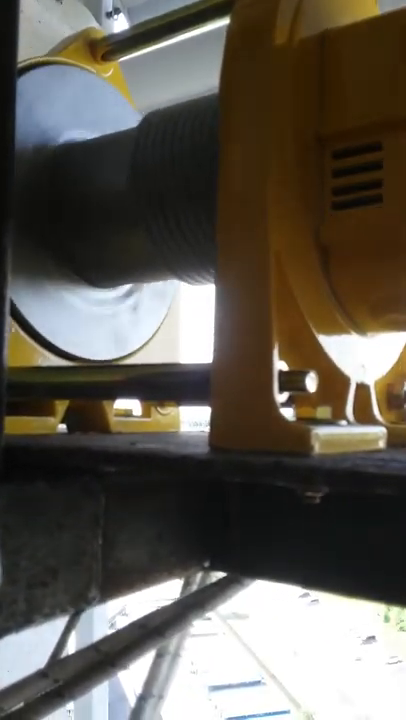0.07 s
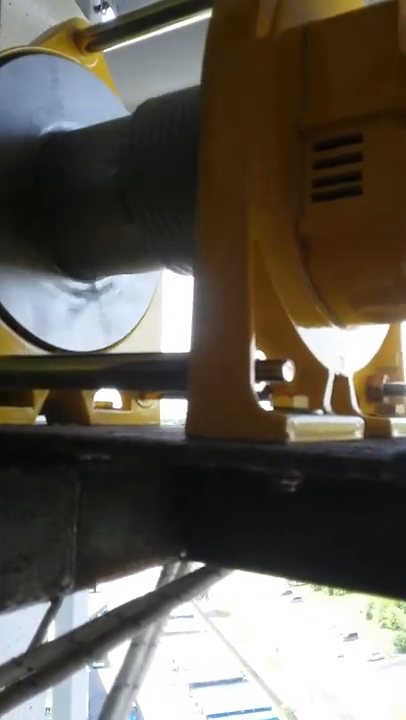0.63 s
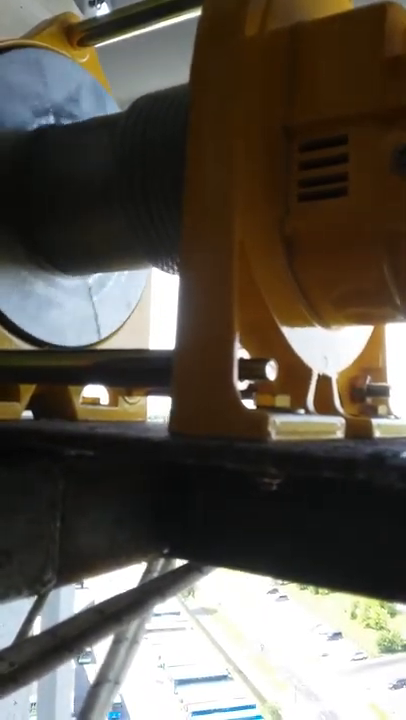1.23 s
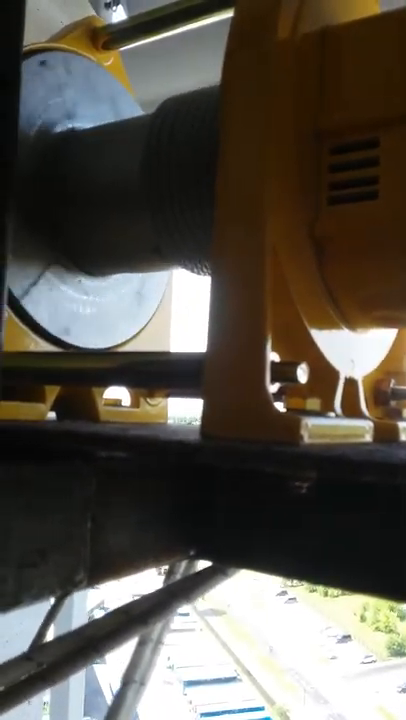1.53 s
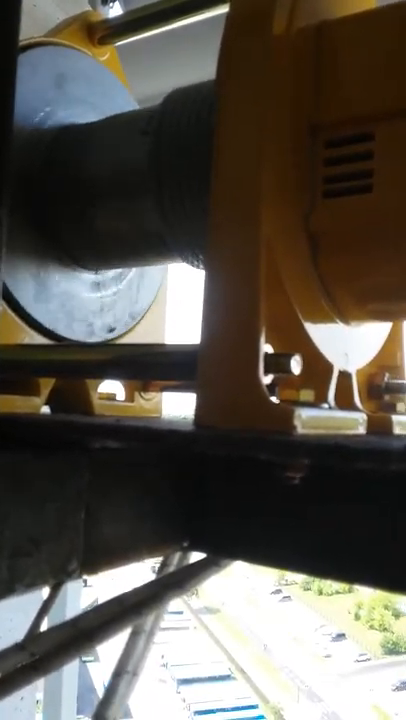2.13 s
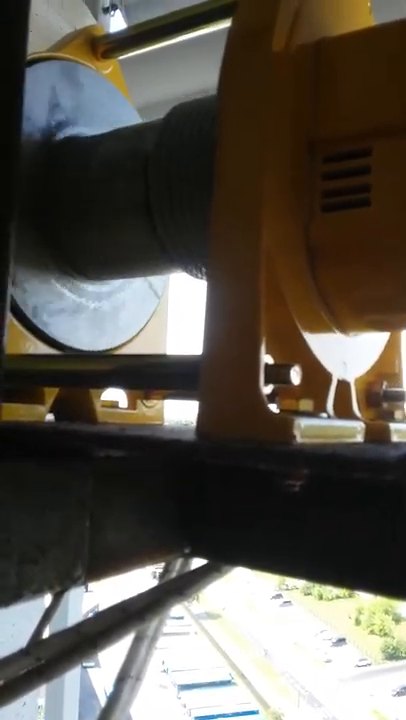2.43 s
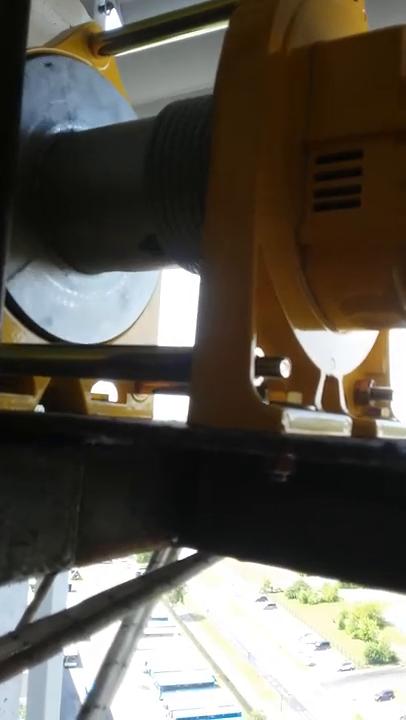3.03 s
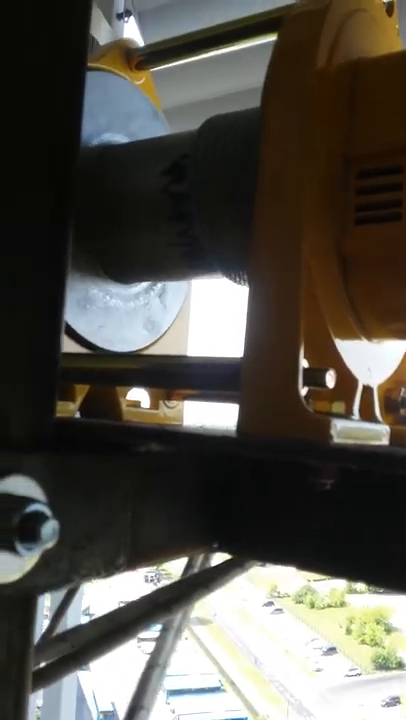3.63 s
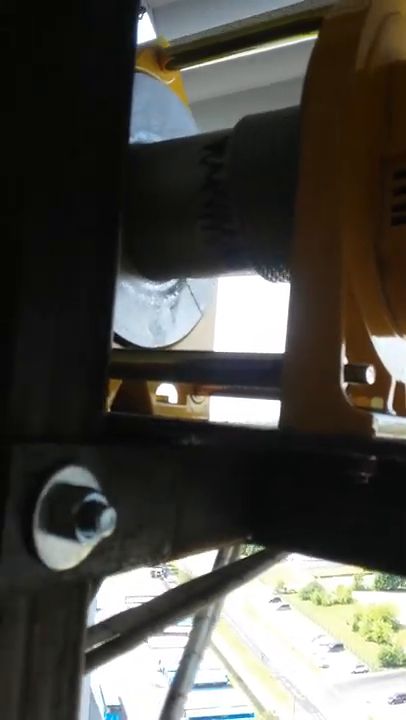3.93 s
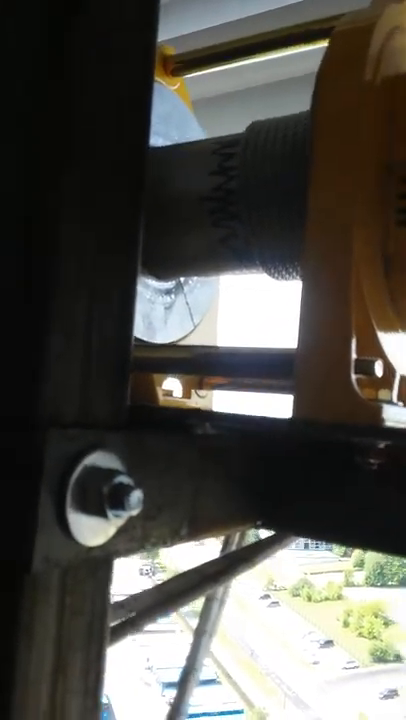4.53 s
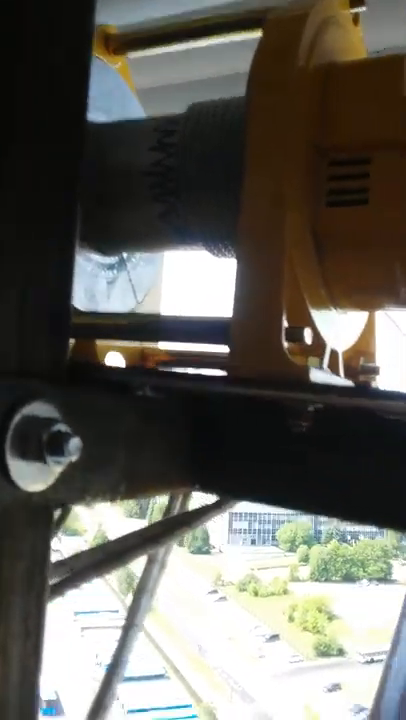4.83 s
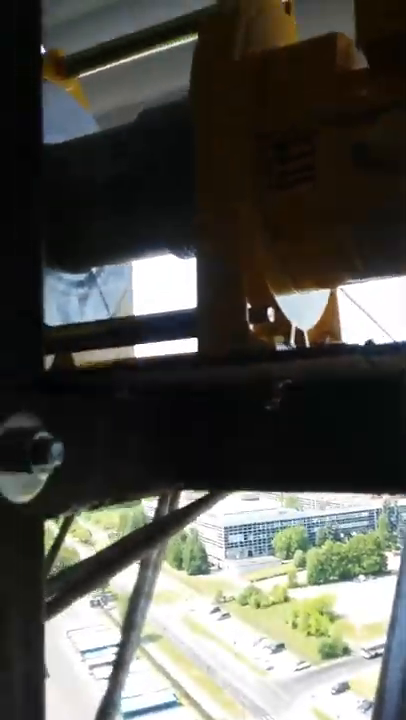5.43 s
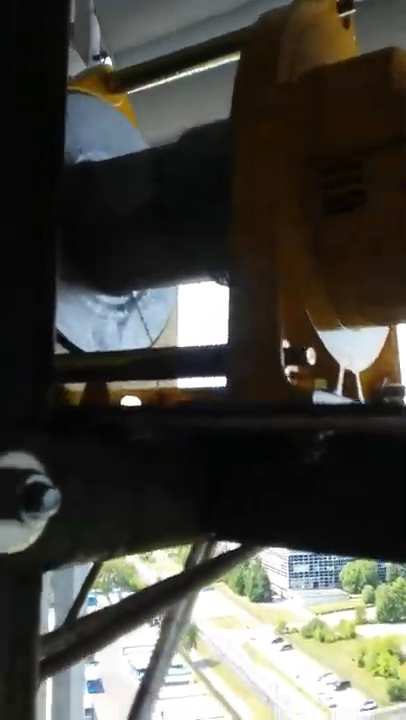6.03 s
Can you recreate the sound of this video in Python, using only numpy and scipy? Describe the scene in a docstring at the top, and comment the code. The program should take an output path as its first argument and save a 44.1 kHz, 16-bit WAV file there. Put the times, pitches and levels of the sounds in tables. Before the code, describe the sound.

An electric rope hoist runs loudly at full speed, close by on an outdoor steel frame: gears rattle the housing, the motor whines, and the fan rushes with a high hiss. At 0.7 seconds the power cuts and the pitch drops steeply. A soft puff of wind bumps the microphone at 1.2 seconds, and a dull clank follows at 1.4. At 1.7 a short burst of power sends the whine up, then it falls again. The hoist coasts with a sinking whistle, slowing gear knocks and the thin ring of rubbing steel, fading and dulling until it stops around 4.6 seconds. Small metallic ticks come at 4.8 and 5.1, with a fainter one between, followed by a light scratchy rustle. A distant town's low wash and faint machine hum lie underneath. At 6.2 seconds the motor suddenly restarts with knocks and a harsh rasp.

```python
"""An electric rope hoist on a high steel frame runs at full speed above a distant town: gear teeth
rattle the housing, the rotor (the motor's spinning part) whines and the fan rushes. At 0.7 s the power
goes off and a brake slows it; a soft gust passes. After one short burst of power at 1.7 s it coasts
to rest, its whistle falling and a rubbing steel part ringing. Around 5 s come two small ticks, with
a fainter one between them, and a light rustle. At 6.2 s the motor kicks in again with a rasp."""
import sys
import numpy as np
from scipy import signal
from scipy.fft import rfft, irfft
from scipy.io import wavfile
from scipy.ndimage import uniform_filter1d

SR = 44100
rng = np.random.default_rng(int(sys.argv[2]) if len(sys.argv) > 2 else 0)


def transcribe(u):
    """Save the signal u as a 16-bit wav file named by the first command-line argument.

    u: samples, shape (n,) or (channels, n), limited to [-1, 1]; the rate is SR.
    q: integer samples, one column per channel.
    """
    v = np.clip(np.atleast_2d(u).T, -1, 1)
    q = np.round(v * 32767).astype(np.int16)
    wavfile.write(sys.argv[1], SR, q)


N = 276948
TIME = np.arange(N) / SR
FULL_HZ, RELEASE_HZ = 220, 77.2  # rotor turns a second: at full speed, and where the brake lets go
WHEEL_RATIO = .4425  # turns of the slower gear wheel for each rotor turn
TEETH, TOP_HZ = 16, 15650  # teeth on the rotor's small gear; upper edge of the treble

# rotor speed during each of the three spells of power: t/s, speed/Hz
RUN = [(0, 231), (.26, 216.3), (.42, 222), (.55, 214.6), (.689, 203)]
BURST = [(1.69, 55), (1.72, 108), (1.75, 128), (1.79, 146), (1.844, 154)]
RESTART = [(6.189, 63), (6.235, 76), (6.28, 82)]
# how strongly the gear housing gives off each pitch: f/Hz, level/dB
GEAR_COLOUR = [(60, -32), (140, -15.5), (220, -10.5), (300, -8), (430, -2), (620, -4), (900, 1),
               (1300, -2.5), (1800, -1), (2230, -1.5), (2450, -11), (3500, -9.5), (5300, -25.5),
               (7500, -49.5)]


def rotor(drive_db=1.5, braking_db=-7, build_s=.097, brake_rise_s=.064):
    """Speed and torque (twisting force): the motor pulls hardest when slow, and runs down when off."""
    hz, torque = np.zeros(N), np.zeros(N)
    for spell in (RUN, BURST, RESTART):
        (on, _), (off, last_hz) = spell[0], spell[-1]
        speed = np.where(TIME < off, curve(spell), run_down(last_hz, TIME - off))
        slip = np.maximum(1 - speed / FULL_HZ, 0)
        driving = undb(drive_db) * slip ** 1.75 * np.clip((TIME - on) / build_s, 0, 1) ** 1.3
        braking = undb(braking_db) * brake_grip(speed) ** 1.1
        cut = np.clip((TIME - off) / brake_rise_s, 0, 1)
        hz = np.where(TIME < on, hz, speed)
        torque = np.where(TIME < on, torque, (1 - cut) * driving + cut * braking)
    return hz, torque


def run_down(hz, age, friction_hz_per_s=26.2, drag_per_s=.126, brake_hz_per_s=666, step_s=.001):
    """Speed after the power is cut: a steep fall under the brake, then a long coast to rest."""
    speeds = [hz]
    while speeds[-1] > 0:
        now = speeds[-1]
        slowing = friction_hz_per_s + drag_per_s * now + brake_hz_per_s * brake_grip(now) ** .562
        speeds.append(max(now - step_s * slowing, 0))
    return np.interp(age, step_s * np.arange(len(speeds)), speeds)


def brake_grip(hz):
    """How hard the brake holds: 1 at full speed, 0 once it has let go."""
    return np.maximum(hz - RELEASE_HZ, 0) / (FULL_HZ - RELEASE_HZ)


def gears(turns, slap=1.24, slap_turns=.029, throb=.16, grind=.91):
    """Teeth strike unevenly, harder once per turn of the slower wheel, and make the housing ring."""
    # ringing notes of the housing and frame: f/Hz, width/Hz, level/dB over GEAR_COLOUR
    housing = [(200, 23, 6.5), (343, 29, 4.5), (421, 27, -3.5), (545, 11, 4), (805, 26, 0.5),
               (962.6, 5.5, 6.5), (1084, 16, 5.5), (1280, 39, -13), (1510, 15, 3.5), (1606, 2.2, 9),
               (1710, 19, 5.5), (1753, 5.7, 12.5), (1950, 20, 0), (1925, 55, 3.5), (2136, 27, 7.5),
               (2248, 2.8, 10), (2656, 85, 7), (4350, 56, 6)]
    contacts = each_turn(2 * TEETH * turns)  # each tooth touches on both sides
    strikes = unit(contacts * noise() * scatter(3.5))
    strikes /= np.sqrt(uniform_filter1d(strikes ** 2, SR // 8) + 1e-3)  # equal power at every speed
    wheel = 1 + slap * np.exp(-(WHEEL_RATIO * turns % 1) / slap_turns)
    wheel += throb * np.cos(2 * np.pi * 3 * WHEEL_RATIO * turns)
    force = (unit(strikes * wheel) + grind * noise()) * undb(-.18 * wander(33))
    return ring(force, colour(GEAR_COLOUR) * np.sqrt(1 + resonances(housing)))


def knocks(hz, turns, rattle_gain, ring_hz=1860, decay_s=.00082, grit_db=-8):
    """Slack in the gears closes with a dull clank: once a wheel turn off the brake, a few times hard."""
    # single hard knocks: t/s, level/dB
    hard_knocks = [(1.362, -8.5), (1.695, -17.5), (6.192, -11), (6.213, -12)]
    # tone of the grit in each clank: f/Hz, level/dB
    grit_colour = [(600, -16), (1500, 20), (2200, -17), (3500, -18)]
    grit = undb(grit_db) * ring(noise(), colour(grit_colour))
    looseness = np.maximum(1 - brake_grip(hz), 0)  # the knocks fade out towards full speed
    hits = each_turn(WHEEL_RATIO * turns) * rattle_gain * looseness * undb(.5) * scatter(1.5)
    for s, db in hard_knocks:
        hits[round(s * SR)] += undb(db)
    age, size = (part[:SR // 50] for part in blow(0, 0, decay_s))
    clank = signal.fftconvolve(hits, size * np.sin(2 * np.pi * ring_hz * age))[:N]
    crunch = grit * signal.fftconvolve(hits, size)[:N]
    return filtered(clank + crunch, "lowpass", 4000, order=4)


def soften(rattle, hz, soft_speed_hz=15, dull_db=7.5):
    """Slow teeth roll onto each other, so the rattle turns dull just before the rotor stops."""
    hard = 1 - np.exp(-(hz / soft_speed_hz) ** 2)
    dull = filtered(rattle, "lowpass", 1860, order=2)
    return hard * rattle + (1 - hard) * undb(dull_db) * dull


def jolt(db=-18, rise_s=.0054, decay_s=.21):
    """The sudden twist of the last start sets the housing ringing with a harsh rasp."""
    # notes shaken by the jolt: f/Hz, width/Hz, level/dB
    modes = [(2130, 110, 2), (3550, 750, -18), (5100, 320, -16)]
    age = np.maximum(TIME - RESTART[0][0], 0)
    outline = colour([(800, -25), (2000, -2.5), (5400, .5), (7000, -9)])
    rasp = ring(noise(), np.sqrt(resonances(modes)) * outline)
    return undb(db) * (1 - np.exp(-age / rise_s)) * np.exp(-age / decay_s) * rasp


def gear_whine(hz, turns, torque):
    """The small gear sings at the rate its teeth meet, while it drives or brakes the rope drum."""
    # tones of the loaded gear: multiple of the tooth rate, level/dB
    overtones = [(1, -1.5), (2, -29.5), (3, -29)]
    song = sum(undb(db) * tone(turns, TEETH * round(k), rough=.8, flutter_hz=120) for k, db in overtones)
    housing_gain = undb(np.interp(TEETH * hz, *np.transpose(GEAR_COLOUR)))
    return torque * housing_gain * filtered(song, "lowpass", 4000, order=8)


def whistle(hz, turns, boost_db=1.6, onset_speeds_hz=(24, 52)):
    """High rotor tones follow the speed, and swell at pitches where the frame rings easily."""
    # tones of the rotor: multiple of its speed, level/dB
    overtones = [(48, -40.5), (96, -47.5), (144, -49.5)]
    # how well the frame gives off each pitch: f/Hz, level/dB
    radiation = [(1200, -16), (2400, -5), (3100, -2), (3700, 2), (4400, -3.5), (5400, -2.5), (6200, -9),
                 (7400, -12), (9200, -12), (10000, -8.5), (10700, -5), (11500, -28)]
    song = 0
    for k, db in overtones:
        pitch = k * hz
        frame_gain = (pitch < TOP_HZ) * undb(np.interp(pitch, *np.transpose(radiation)))
        song += undb(db) * frame_gain * tone(turns, k, rough=1.1, flutter_hz=90)
    turning = np.interp(hz, onset_speeds_hz, (0, 1))
    return undb(boost_db) * plates(song * turning, decay_s=.01, share=.2)


def fan(hz, turns, air_db=-24, boom_db=-44.5, boom_hz=205.5, boom_width_hz=29):
    """Rushing air, blade tones and the boom of the shaken frame all grow with speed."""
    # tones of the off-balance rotor and the blades: multiple of rotor speed, level/dB
    fan_tones = [(1, -30), (2, -31.5), (10, -21), (49, -52)]
    # tone of the rushing air: f/Hz, level/dB
    air_colour = [(120, -47), (200, -2), (300, -1), (430, -13), (800, 8.5), (2000, 2), (4200, -19),
                  (8000, -30)]
    tones = sum(undb(db) * tone(turns, round(k), rough=.53, flutter_hz=12 + 3 * round(k))
                for k, db in fan_tones)
    tones = filtered(tones, "highpass", 190, order=6)  # deep tones pass poorly into the air
    air = undb(air_db) * ring(noise(), colour(air_colour))
    boom = undb(boom_db) * ring(noise(), resonances([(boom_hz, boom_width_hz, boom_db)]))
    speed = hz / FULL_HZ
    return tones * speed ** 2.1 + air * speed ** 1.3 + boom * speed


def rubbing(hz, turns, throb=.19, patchy_db=2.2):
    """Rubbing steel catches once a turn, grips in patches and rings in a cluster of close notes."""
    # ringing notes of the rubbed steel: f/Hz, width/Hz, level/dB
    modes = [(2710, 21, -3), (3040, 57, -4.5), (3110, 13, 2), (3123, 15, 2), (3175, 17, 5.5),
             (3317, 25, -2.5), (5260, 71, -31.5)]
    catch = (1 + throb * np.cos(2 * np.pi * turns)) * undb(patchy_db * wander(9))
    outline = colour([(1500, 6), (2700, -15), (5400, 2), (7000, -37)])
    ringing = ring(noise() * catch, np.sqrt(resonances(modes)) * outline)
    return loudness(hz, top_db=-32, knee_hz=23.3, steepness=2.43) * ringing


def hiss(hz, fade_speed_hz=28, flare=.18, flare_s=.04):
    """A grainy high hiss that flares briefly as the power is cut and dies away at low speed."""
    # tone of the hiss: f/Hz, level/dB
    hiss_colour = [(3000, -18), (5200, 6.5), (6400, 1), (7500, -3), (9300, 3.5), (10700, -5), (12500, -10),
                   (15500, -52)]
    treble_fade = 1 - np.exp(-(hz / fade_speed_hz) ** 4)
    cuts = sum(swell(spell[-1][0], flare_s) for spell in (RUN, BURST))
    gain = loudness(hz, top_db=-32, knee_hz=161, steepness=1.34) * treble_fade * (1 + flare * cuts)
    grains = noise() * undb(1.5 * wander(320) - .5 * wander(35))
    return gain * plates(ring(grains, colour(hiss_colour)), decay_s=.015, share=.1)


def plates(x, decay_s, share):
    """Large steel plates ring on briefly, with countless close notes."""
    age = TIME[:SR // 5]
    tail = rng.standard_normal(len(age)) * np.exp(-age / decay_s)
    ringing = signal.fftconvolve(x, tail)[:N] / np.sqrt(np.sum(tail ** 2))
    return np.sqrt(1 - share) * x + np.sqrt(share) * ringing


def ticks(thud_pitch_ratio=.43, thud_db=-7):
    """Each tick is a sharp crack, a very short ring and a lower thud in the metal behind it."""
    # small ticks: t/s, level/dB, f/Hz, decay/s, crack/dB relative to the ring
    events = [(4.7917, -19, 3030, 0.0006, -47), (4.948, -43, 3600, 0.00046, -19),
              (5.133, -27, 2990, 0.00091, -5.5)]
    crack = ring(noise(), colour([(2000, 1), (4500, 8), (6000, -15), (7400, 8), (9500, -13), (15000, -1)]))
    out = np.zeros(N)
    for s, db, hz, decay_s, crack_db in events:
        age, size = blow(s, db, decay_s)
        angle = 2 * np.pi * hz * age
        thud = undb(thud_db) * np.sin(thud_pitch_ratio * angle)
        out += size * (np.sin(angle) + thud + undb(crack_db) * crack)
    return out


def rustle(grain_db=3):
    """A hand shifts its grip with a faint, scratchy rustle."""
    # movements of the hand: t/s, level/dB, width/s
    moves = [(5.135, -47, .012), (5.267, -59, 0.23)]
    # tone of the rustle: f/Hz, level/dB
    rustle_colour = [(1000, -8), (2900, 10), (4600, 6), (6000, -22), (7400, -7), (9000, -22), (15000, -18)]
    size = sum(undb(db) * swell(s, width_s) for s, db, width_s in moves)
    return size * ring(noise() * undb(grain_db * wander(120)), colour(rustle_colour))


def hum():
    """Faraway machines hold a few faint, wavering tones."""
    # tones of the machines: f/Hz, level/dB
    notes = [(94, -54), (167, -54.5), (188, -64), (248, -54.5), (382, -54.5), (587, -50.5), (974, -56)]
    return sum(undb(db) * tone(TIME, hz, rough=.95, flutter_hz=5.5) for hz, db in notes)


def town(db=-39.37, waver_db=.6):
    """The town far below blends into a low, gently wavering wash of noise."""
    # tone of the town: f/Hz, level/dB
    town_colour = [(25, -37), (40, -36), (58, -1), (85, -5), (180, -2.5), (280, -5), (380, -6), (600, -7.5),
                   (1100, -9.5), (2000, -17), (3200, -25.5), (4700, -38.5), (6400, -61.5), (15000, -51)]
    return ring(noise(), colour(town_colour)) * undb(db + waver_db * wander(15))


def gust(at_s=1.212, db=-30, width_s=.02):
    """One soft puff of wind bumps the microphone."""
    rumble = ring(noise(), colour([(40, -22), (95, 3), (140, 0), (260, -11), (1000, -61)]))
    return undb(db) * swell(at_s, width_s) * rumble


def undb(db):
    """Turn decibels into a gain to multiply by."""
    return 10 ** (np.asarray(db) / 20)


def curve(rows):
    """Join (time, value) points with straight lines."""
    return np.interp(TIME, *np.transpose(rows))


def unit(x):
    """Scale a signal to an average size (rms) of 1."""
    return x / np.sqrt(np.mean(x ** 2))


def noise():
    """White noise: all pitches equally strong."""
    return rng.standard_normal(N)


def scatter(db):
    """Random gains, spread by about db decibels."""
    return undb(db * np.clip(noise(), -2, 2))


def wander(rate_hz):
    """A smooth random drift of size 1 that changes about rate_hz times a second."""
    return unit(irfft(rfft(noise()) * np.exp(-(np.fft.rfftfreq(N, 1 / SR) / rate_hz) ** 2), N))


def each_turn(turns):
    """One pulse whenever the count passes a whole number."""
    return np.diff(np.floor(turns), prepend=0) > 0


def colour(points):
    """Gain at every frequency, from an outline of points: f/Hz, level/dB."""
    hz, db = np.transpose(points)
    return undb(np.interp(np.log(np.fft.rfftfreq(N, 1 / SR) + 1), np.log(hz), db))


def resonances(modes):
    """Power at every frequency, with one peak for each ringing note (mode)."""
    f = np.fft.rfftfreq(N, 1 / SR)
    return sum(undb(db) ** 2 / (1 + (2 * (f - hz) / width) ** 2) for hz, width, db in modes)


def ring(x, gain):
    """Shape the tone of x by a gain at every frequency; the result has size 1."""
    cepstrum = irfft(np.log(gain + 1e-7), N)
    cepstrum[1:N // 2] *= 2  # fold it forward in time, so a blow rings only after it lands
    cepstrum[N // 2 + 1:] = 0
    return unit(irfft(rfft(x) * np.exp(rfft(cepstrum)), N))


def filtered(x, kind, hz, order):
    """Keep what lies below (lowpass) or above (highpass) a frequency."""
    return signal.sosfilt(signal.butter(order, hz, kind, fs=SR, output="sos"), x)


def tone(turns, multiple, rough, flutter_hz):
    """A tone at a multiple of the turning rate, fluttering in size and timing."""
    angle = 2 * np.pi * multiple * turns
    wave = (1 + rough * wander(flutter_hz)) * np.sin(angle)
    wobble = rough * wander(flutter_hz) * np.cos(angle)
    return (wave + wobble) / np.sqrt(.5 + rough ** 2)


def blow(s, db, decay_s):
    """The time since a short blow, and its size as it swells and dies."""
    age = np.maximum(TIME - s, 0)
    return age, undb(db) * age / decay_s * np.exp(1 - age / decay_s)


def swell(s, width_s):
    """A smooth rise and fall around one moment."""
    return np.exp(-.5 * ((TIME - s) / width_s) ** 2)


def loudness(hz, top_db, knee_hz, steepness):
    """A gain that grows with speed and levels off above the knee speed."""
    return undb(top_db) * (hz / np.hypot(hz, knee_hz)) ** steepness


def scene(slack_rattle=.19, slack_s=.056):
    """One rotor drives every running sound of the hoist; small noises and the town lie behind it."""
    hz, torque = rotor()
    turns = np.cumsum(hz) / SR
    # extra rattle as each start takes up the slack in the gears
    starts = sum((TIME > on) * np.exp(-np.abs(TIME - on) / slack_s) for on, _ in (BURST[0], RESTART[0]))
    rattle_gain = loudness(hz, top_db=-11.5, knee_hz=178.7, steepness=1.386) * (1 + slack_rattle * starts)
    clatter = soften(rattle_gain * gears(turns) + knocks(hz, turns, rattle_gain), hz) + jolt()
    high_noise = rubbing(hz, turns) + hiss(hz)
    tones = gear_whine(hz, turns, torque) + whistle(hz, turns)
    hoist = clatter + high_noise + tones + fan(hz, turns)
    return (hoist + ticks() + rustle() + hum() + town() + gust())[None]


def record(dry):
    """The microphone rounds off the loudest peaks and loses the highest treble."""
    rounded = np.tanh(.71 * dry) / .7
    return signal.sosfilt(signal.ellip(10, .2, 80, TOP_HZ, fs=SR, output="sos"), rounded)


dry = scene()
out = record(dry)
transcribe(out)
```